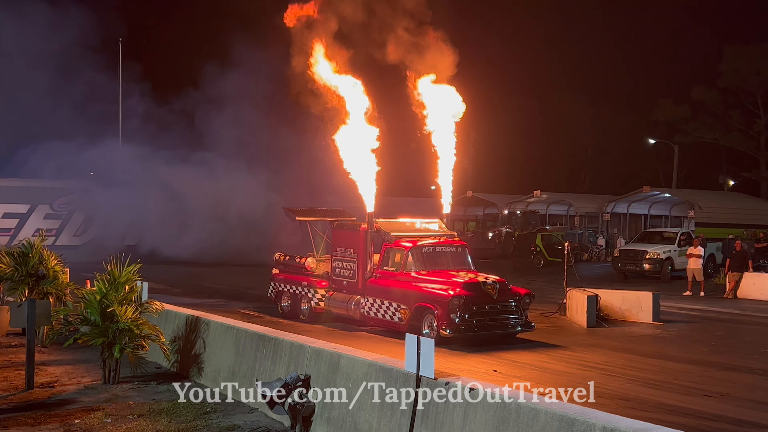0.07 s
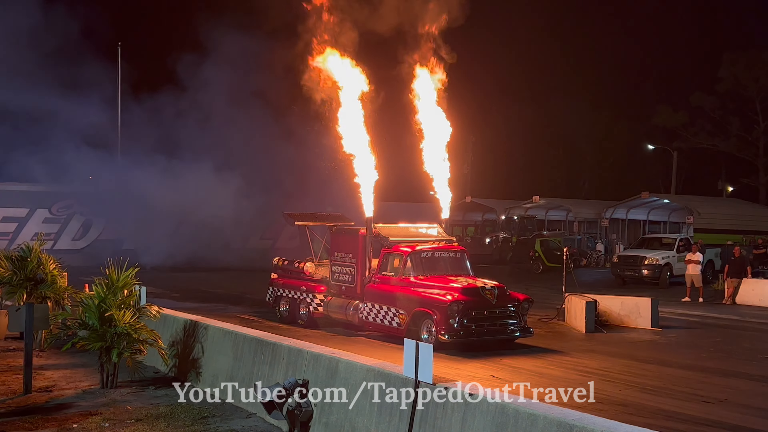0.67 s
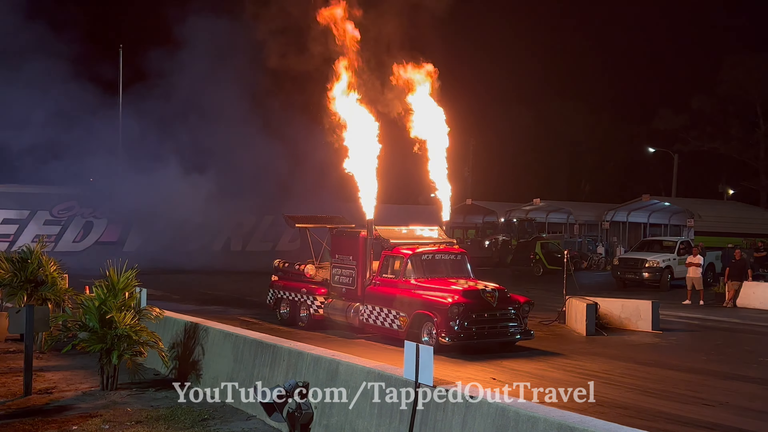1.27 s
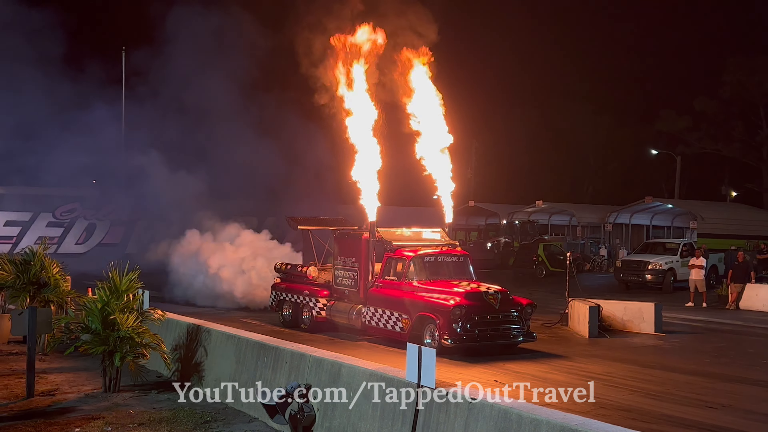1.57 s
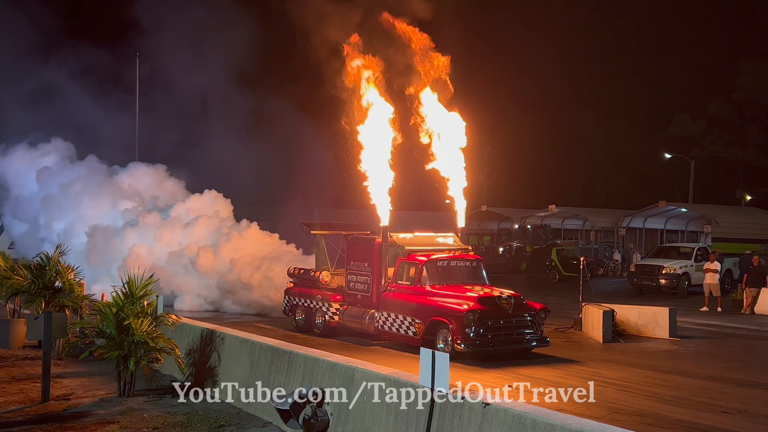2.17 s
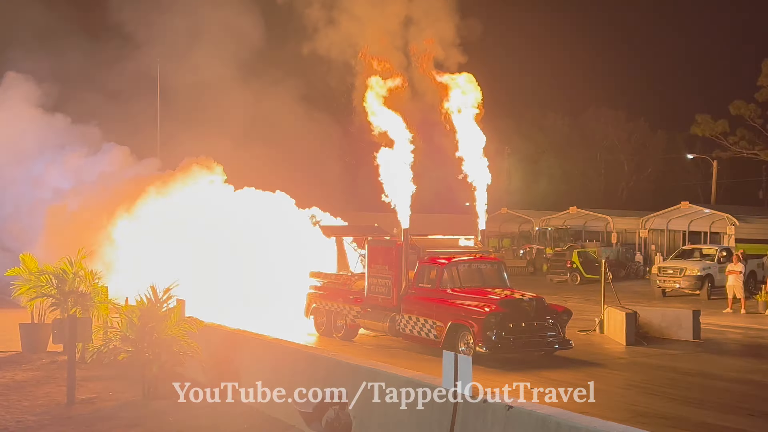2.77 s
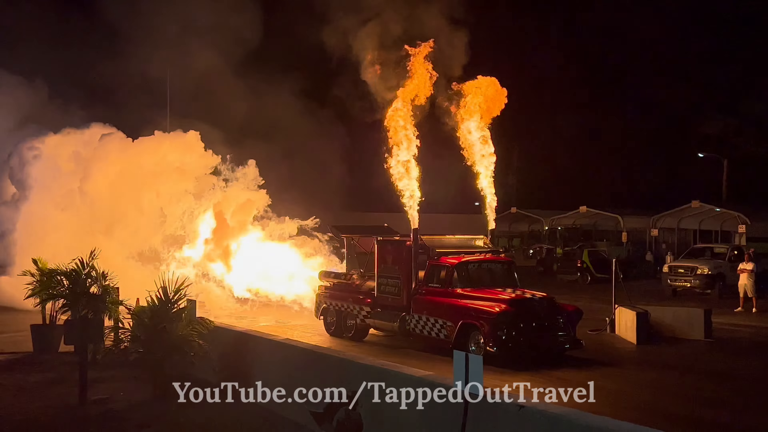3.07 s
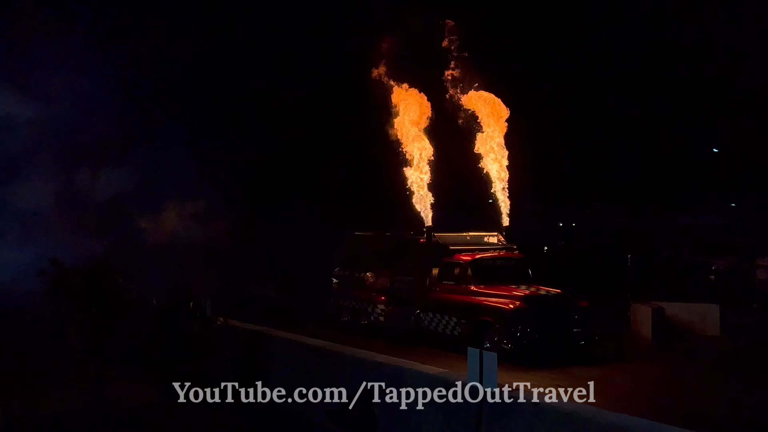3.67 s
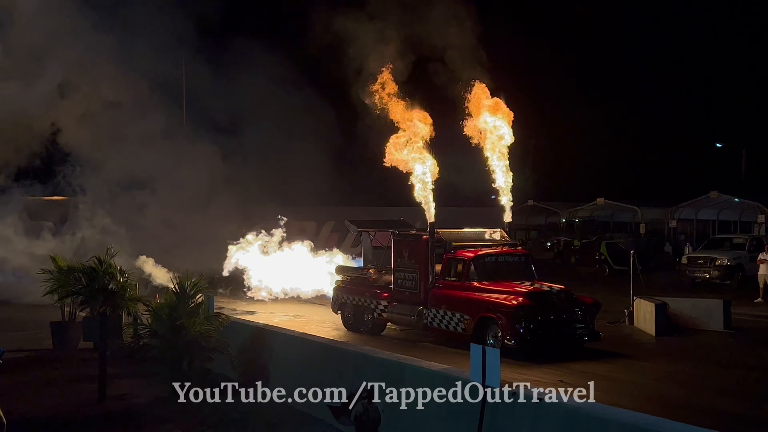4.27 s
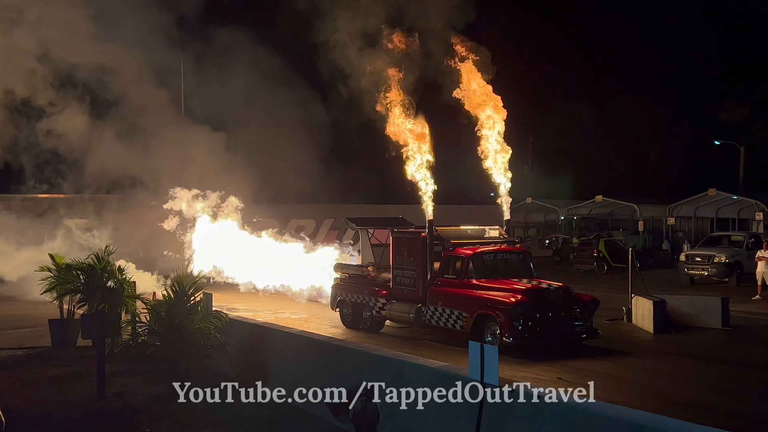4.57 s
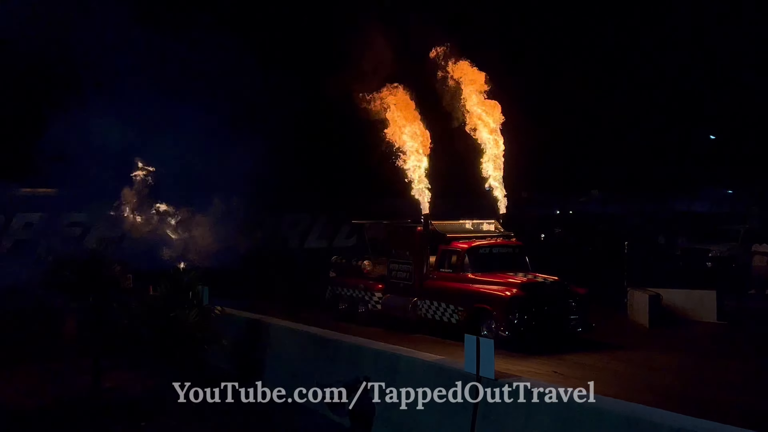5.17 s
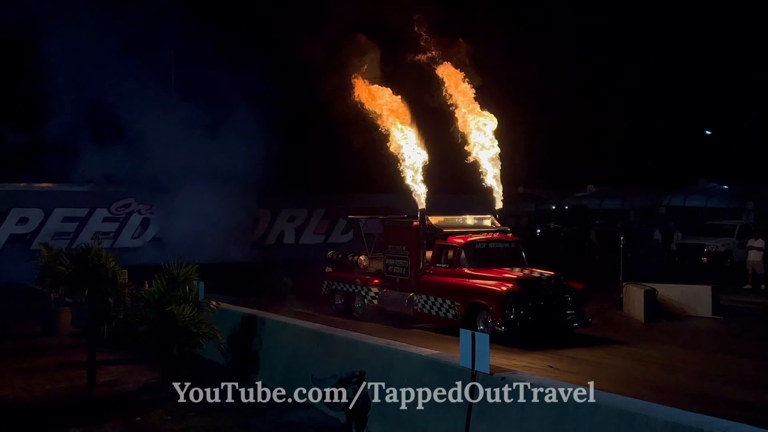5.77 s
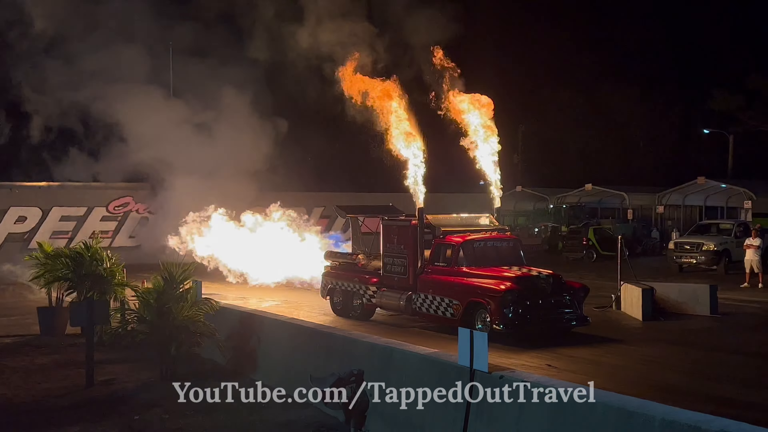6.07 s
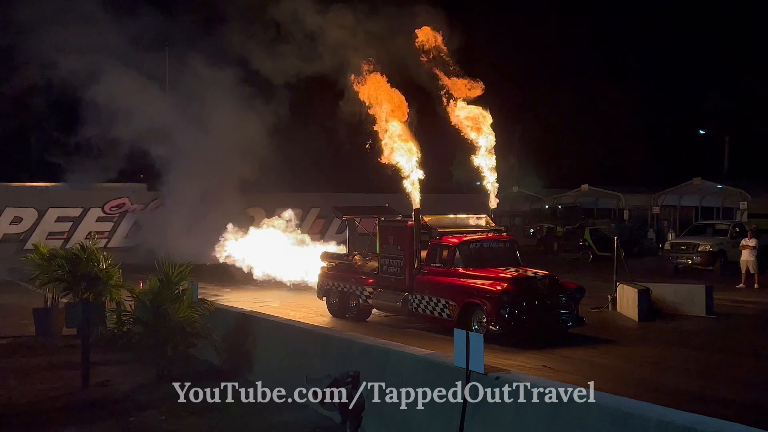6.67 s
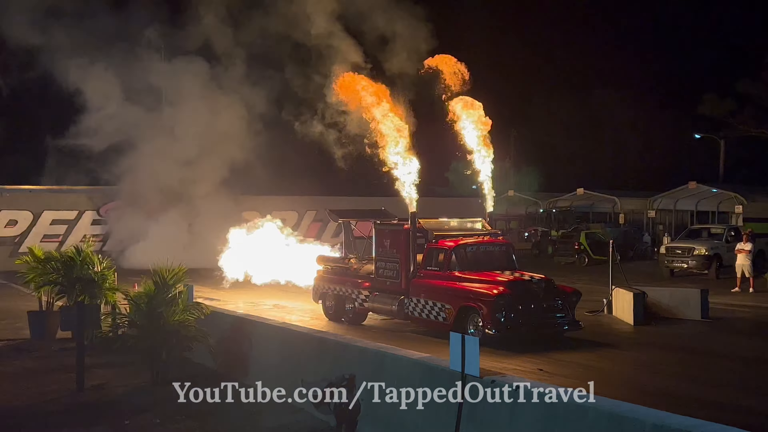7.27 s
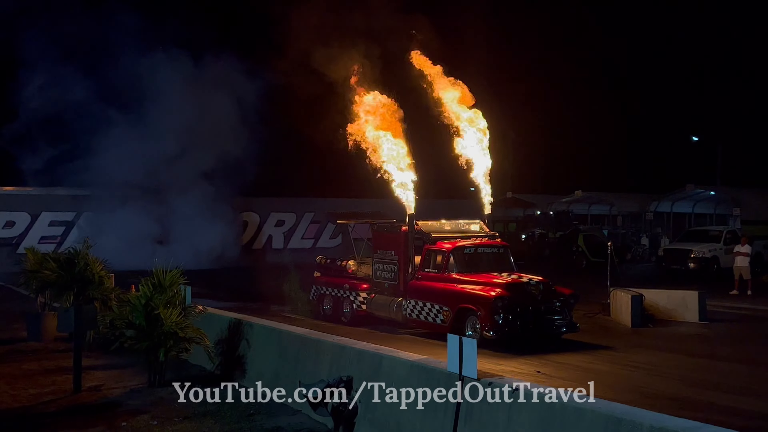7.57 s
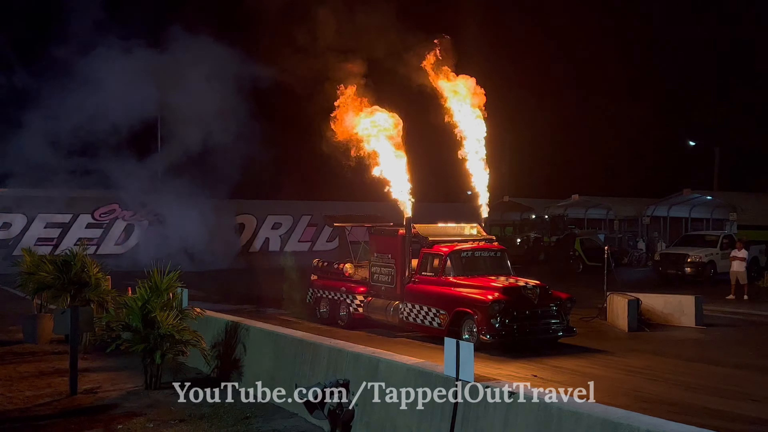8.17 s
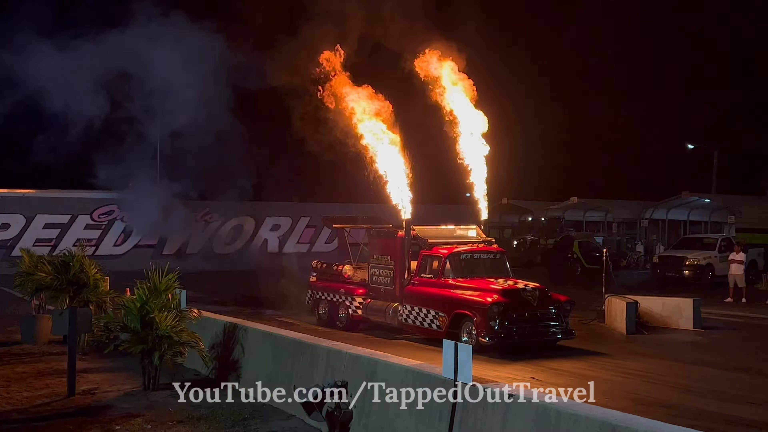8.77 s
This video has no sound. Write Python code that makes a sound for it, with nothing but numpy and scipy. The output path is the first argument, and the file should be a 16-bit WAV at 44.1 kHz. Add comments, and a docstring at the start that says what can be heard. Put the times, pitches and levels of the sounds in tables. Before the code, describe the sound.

From the start, a stationary jet truck's two turbines hold a high, shimmering whine at nearly the same pitch. Beneath it run a broad rush of air and the low flutter and hum of flame stacks. At about 2.7 seconds the afterburner lights with a loud, deep boom and roars until 3.7. Two quick blasts lead into another long burn from 4.2 to 5.2. Three short bursts follow, then a sustained roar from 5.9 to 6.6 and four rapid pulses ending near 7.4. Each begins with a tearing edge and swells into a sputtering fireball, with low thumps punching through and a brief outdoor echo. The whine continues throughout, sagging slightly and recovering. After a lull with just turbines, air and flames, three softer bursts come at about 8.3, 8.7 and 8.9 seconds. Everything sits nearly straight ahead.

```python
"""Two turbines whine at nearly the same pitch: a jet truck standing on a drag strip. Their blade
tones, each locked to its shaft, ride on a rush of air and the low flutter of two flame stacks.
Near 2.7 s the afterburner lights with a boom and is pulsed again and again. Each gush of fuel tears
at the jet and swells into a fireball. Low thumps punch through, and the shaft speeds sag and recover."""
import sys
import numpy as np
from scipy import signal
from scipy.fft import rfft, irfft, next_fast_len
from scipy.io import wavfile
from scipy.ndimage import uniform_filter1d

SR = 44100
rng = np.random.default_rng(int(sys.argv[2]) if len(sys.argv) > 2 else 0)


def int16_out(signal):
    """Quantize to a 16-bit WAV file."""
    q = np.round(np.clip(np.atleast_2d(signal).T, -1, 1) * 32767)
    wavfile.write(sys.argv[1], SR, q.astype(np.int16))


N = 393813
T = np.arange(N) / SR
HZ = np.fft.rfftfreq(next_fast_len(N, True), 1 / SR)
FFT_SIZE = 2 * len(HZ) - 2


def gain_of(db):
    """Decibels to amplitude."""
    return 10 ** (np.asarray(db) / 20)


def spectrum_curve(points):
    """A spectrum table on the frequency grid, joined on a log axis."""
    hz, value = np.transpose(points)
    return np.interp(np.log(HZ + 1), np.log(hz + 1), value)


def automation(rows):
    """Each column of a timed table as a curve with a value at every sample."""
    time_s, *columns = np.transpose(rows)
    return [np.interp(T, time_s, column) for column in columns]


def drift(rate_hz, count=2048):
    """A random wobble of rms one, moving at up to about the given rate."""
    hz = np.fft.rfftfreq(count, T[-1] / count)
    wobble = irfft(rfft(rng.standard_normal(count)) / (1 + (hz / rate_hz) ** 2))
    wobble /= np.sqrt(np.mean(wobble ** 2) + 1e-20)
    return np.interp(T, np.linspace(0, T[-1], count), wobble)


def blade_tone(turns, order, level_db, fade_db, scatter):
    """One multiple of the shaft speed; hot, moving air fades it and scatters its phase."""
    shimmer = 1 + scatter * (drift(rate_hz=17) + 1j * drift(rate_hz=17))
    level = np.sqrt(2) * gain_of(level_db + fade_db * drift(rate_hz=4.4))
    phase = 2 * np.pi * (order * turns + rng.random())
    return level * (shimmer * np.exp(1j * phase)).real


def uneven_blades(turns, over_rush_db, count=130, size=8192):
    """No two blades are alike: a ragged pattern repeats each turn as a faint buzz of shaft orders."""
    order = np.arange(count)
    mean_shaft_hz = turns[-1] / T[-1]
    rush_db = np.interp(order * mean_shaft_hz, *np.transpose(AIR_BODY + AIR_HISS))
    partials = rng.standard_normal(count) + 1j * rng.standard_normal(count)
    partials *= gain_of(rush_db + over_rush_db)
    has_own_voice = np.isin(order, [k for k, _ in LEAD_TONES])
    partials[(order < 3) | has_own_voice] = 0
    one_turn = irfft(partials, size) * size / 2
    return np.interp(turns % 1, np.arange(size) / size, one_turn)


# First blade row, second blade row, octave of the first: shaft_multiple, scatter_ratio
LEAD_TONES = [(17, .2), (20, .2), (34, .33)]
def turbine(shaft_hz, whine_db, octave_db, faint_tones, first_row_db, first_row_dip_db):
    """Blade rows, overtones and gears, all locked to one shaft; their balance shifts as it sags."""
    turns = np.cumsum(shaft_hz * (1 + .00015 * drift(rate_hz=6))) / SR
    sag = np.clip((shaft_hz.max() - shaft_hz - .06) / .65, 0, 1)  # 0 at top speed, 1 at full sag
    lead_levels_db = first_row_db - first_row_dip_db * sag, whine_db, octave_db
    lead = sum(blade_tone(turns, order, db, fade_db=1.53, scatter=scatter)
               for (order, scatter), db in zip(LEAD_TONES, lead_levels_db))
    faint = sum(blade_tone(turns, order, db - dip_db * sag, fade_db=1.1, scatter=.22)
                for order, db, dip_db in faint_tones)
    return lead + faint + uneven_blades(turns, over_rush_db=7)


# Shaft speeds, sagging and recovering: time_s, slow_turbine_hz, fast_turbine_hz
SHAFT_SPEEDS = [(0, 109.58, 113.72), (2.72, 109.5, 113.63), (3.05, 109.47, 113.08), (3.72, 109.44, 112.64),
                (4.05, 108.74, 112.42), (4.3, 108.82, 112.43), (4.7, 109.33, 112.82), (5.2, 109.57, 113.04),
                (5.6, 108.97, 112.7), (5.9, 108.7, 112.6), (6.25, 109.38, 112.93), (6.6, 109.54, 113.03),
                (7, 108.95, 112.68), (7.35, 108.76, 112.57), (7.75, 109.16, 113.35), (8.22, 109.42, 113.88),
                (8.5, 109.17, 113.46), (8.93, 109, 113.14)]
# Fader for the main whine, from the second blade row: time_s, slow_turbine_db, fast_turbine_db
WHINE_FADER = [(0, -36.5, -44), (1.7, -35, -40), (2.6, -38.5, -38), (2.9, -42, -30), (3.3, -34.5, -33),
               (5.1, -38.5, -34), (5.6, -36, -34.5), (6.1, -40, -34), (7.4, -38.5, -35), (7.85, -41, -30),
               (8.22, -47, -41), (8.5, -39, -31.5), (8.93, -41, -36.5)]
# Fader for the whistle an octave above the first row: time_s, slow_turbine_db, fast_turbine_db
OCTAVE_FADER = [(0, -55, -47), (.3, -49, -38), (1.05, -40, -37.5), (1.6, -45, -44), (2.8, -41, -47),
                (3.3, -42.5, -37), (4.3, -45, -42.5), (5.4, -47, -39), (6.3, -41, -37.5),
                (7.8, -41.5, -42.5), (8.2, -45, -38), (8.6, -45, -48), (8.93, -50, -39)]
# Faint blade and gear tones of each turbine: shaft_multiple, level_db, dip_at_full_sag_db
SLOW_FAINT_TONES = [(5.41, -47, 0), (23.1, -45.5, 1), (23.8, -47, 2), (24.52, -50, 5), (25, -52, -5),
                    (25.41, -49, 5), (27, -55, 0), (34.9, -59, 0), (37, -51, 4), (40, -47.5, -2),
                    (46, -59, 1), (51, -54, -2), (56, -58, 5), (68, -53, 5), (71, -59, 2), (74, -57, 5),
                    (80, -60, 6), (102, -54, 7)]
FAST_FAINT_TONES = [(25, -54, 0), (26, -54, 0), (28, -56, 3), (37, -48.5, 0), (40, -42.5, 10.5),
                    (49, -59, 1), (51, -40.5, 12), (54, -57, 2), (57, -56, 4), (60, -59, 0), (68, -55, -1),
                    (71, -61, 1), (77, -60, 5), (102, -62, 2)]
def twin_whine():
    """Two turbines, their shafts about 4 Hz apart, sing as a detuned pair."""
    slow_hz, fast_hz = automation(SHAFT_SPEEDS)
    slow_db, fast_db = automation(WHINE_FADER)
    slow_octave_db, fast_octave_db = automation(OCTAVE_FADER)
    slow = turbine(slow_hz, slow_db, slow_octave_db, SLOW_FAINT_TONES,
                   first_row_db=-37, first_row_dip_db=3)
    fast = turbine(fast_hz, fast_db, fast_octave_db, FAST_FAINT_TONES,
                   first_row_db=-44.5, first_row_dip_db=-2.5)  # this row gets louder in a sag
    return slow + fast


# How alike the noise is at the two microphone ports, 1 being mono: freq_hz, correlation
STEREO_LIKENESS = [(60, 1), (140, .995), (300, .965), (500, .93), (800, .89), (1600, .88), (2100, .99),
                   (2400, .99), (2700, .93), (3200, .9), (3700, .94), (4400, 1)]
def turbulence(gain, left_db=0):
    """Churning air: noise of a given amplitude per root Hz, partly shared by left and right."""
    shared, apart = rfft(rng.standard_normal((2, FFT_SIZE)))
    likeness = np.clip(spectrum_curve(STEREO_LIKENESS), 0, 1)
    mid = shared * np.sqrt((1 + likeness) / 2)
    side = apart * np.sqrt((1 - likeness) / 2)
    pan = gain_of(left_db / 2 * HZ ** 2 / (HZ ** 2 + 70 ** 2))  # the longest waves reach both alike
    stereo = np.array([(mid + side) * pan, (mid - side) / pan])
    return irfft(stereo * gain * np.sqrt(SR / 2))[:, :N]


# Body and top-end hiss of the air through the engines: freq_hz, density_db (per Hz)
AIR_BODY = [(120, -75), (290, -69), (400, -62), (800, -62.5), (1200, -63), (1600, -66), (2100, -64),
            (2550, -62.5), (3300, -67.5), (4200, -68.5), (5100, -71), (7200, -71.5)]
AIR_HISS = [(8500, -75), (10000, -80), (11800, -75.5), (13500, -81.5), (15700, -85)]
# Fader for the rush: time_s, gain_db
AIR_FADER = [(0, 0), (1, 0.5), (2.7, 1), (3.2, 1.5), (4, 0.4), (5.3, 0), (6.5, -.5), (7.5, -1.3),
             (8.93, -1)]
def air_rush():
    """A broad bed of intake and exhaust noise, wavering a little in the heat."""
    fader_db, = automation(AIR_FADER)
    air = turbulence(gain_of(spectrum_curve(AIR_BODY + AIR_HISS)))
    return air * gain_of(fader_db + .2 * drift(rate_hz=6))


# Low flutter of the flames: freq_hz, density_db (per Hz)
FLUTTER_SPECTRUM = [(20, -100), (40, -65), (58, -57.5), (110, -60), (190, -65), (290, -73.5), (600, -101)]
# Hum of the exhaust pipes: pitch_hz, width_hz, density_db (per Hz)
PIPE_RESONANCE = [(137.2, 19.6, -48)]
# Fader for flutter and hum together: time_s, gain_db
FLAME_FADER = [(0, 0.5), (1.2, 1.5), (2.6, -1), (7.5, 0.5), (8.1, 1.5), (8.93, -4)]
def flame_stacks():
    """The stack flames flutter and set the exhaust pipes humming."""
    flutter_power = gain_of(spectrum_curve(FLUTTER_SPECTRUM)) ** 2
    pipe_power = sum(gain_of(db) ** 2 / (1 + (2 * (HZ - hz) / width_hz) ** 2) ** 2
                     for hz, width_hz, db in PIPE_RESONANCE)
    fader_db, = automation(FLAME_FADER)
    return turbulence(np.sqrt(flutter_power + pipe_power)) * gain_of(fader_db)


def burn(start_s, length_s, attack_s, release_s):
    """Envelope of one burst: it rises, holds while the fuel flows, and dies once it is cut."""
    attack = np.clip((T - start_s) / attack_s, 0, 1)
    return attack * np.exp(-np.maximum(T - start_s - length_s, 0) / release_s)


def with_tail(power, tail_db, tail_s):
    """Amplitude envelope of a roar together with its dying echo from the walls and stands."""
    feedback = np.exp(-1 / (tail_s * SR))
    tail = signal.lfilter([1 - feedback], [1, -feedback], power)
    return np.sqrt(power + gain_of(tail_db) ** 2 * tail)


def fire_noise(colour, left_db, span_s):
    """Turbulence levelled to an rms near one: the slow swells go, the fast churning stays."""
    noise = turbulence(gain_of(spectrum_curve(colour)), left_db)
    power = uniform_filter1d((noise ** 2).mean(0), int(span_s * SR))
    power = uniform_filter1d(power, int(span_s * SR / 2))
    return noise / np.sqrt(np.abs(power) + 1e-12)


# Tone colour of the afterburner's deep boom and tearing roar: freq_hz, relative_db
BOOM_COLOUR = [(20, -46), (33, -13), (48, -5), (60, 3), (85, -4), (115, -1.5), (145, -2.5), (190, -6.5),
               (250, -13), (400, -25.5), (900, -65)]
ROAR_COLOUR = [(60, 2), (160, -4), (260, -2.5), (400, 2), (550, -4), (800, -6.5), (1100, -13.5),
               (1600, -18.5), (3000, -31), (8000, -62), (15000, -70)]
# Cues for the gushes of fuel: start_s, length_s, swell_s, fireball_db, tearing_db
FUEL_BURSTS = [(2.733, 0.17, .025, -11.5, -22.5), (2.96, 0.7, .025, -12, -26.5),
               (3.789, .1, .05, -15.5, -21.5), (3.994, .1, .025, -12.5, -25),
               (4.186, .99, 0.085, -13.5, -25), (5.28, 0.11, 0.11, -12.5, -24.5),
               (5.49, .12, .03, -15.5, -26), (5.692, 0.094, .07, -14, -24.5),
               (5.899, 0.67, 0.055, -14.5, -26.5), (6.662, .12, .1, -14, -24.5),
               (6.866, 0.1, 0.047, -13.5, -23.5), (7.058, 0.09, .04, -14.5, -23),
               (7.243, 0.12, 0.06, -18, -25.5), (8.27, .14, .13, -17, -26), (8.659, .13, 0.054, -15, -27),
               (8.865, .1, .04, -17.5, -26)]
def afterburner(boom_db, roar_db, sputter_db, billow_db, left_db):
    """Each gush of fuel tears at the jet and then swells into a booming fireball."""
    boom_power, roar_power = np.zeros((2, N))
    for start_s, length_s, swell_s, fireball_db, tearing_db in FUEL_BURSTS:
        fireball = burn(start_s, length_s, attack_s=swell_s, release_s=.028)
        tearing = burn(start_s, length_s, attack_s=.4 * swell_s, release_s=.054)
        flare_db = 4 * np.exp(-np.maximum(T - start_s, 0) / .19)  # the roar flares, then settles
        boom_power += (gain_of(fireball_db) * fireball) ** 2
        roar_power += (gain_of(tearing_db + flare_db) * tearing) ** 2
    boom_level = with_tail(boom_power, tail_db=-8.5, tail_s=.16)
    roar_level = with_tail(roar_power, tail_db=-7, tail_s=.13) * gain_of(roar_db)
    # The boom noise dips around each low thump and around the ignition.
    for centre_s, _, pitch_hz in LOW_THUMPS:
        boom_level *= 1 - .46 * np.exp(-((T - centre_s) * pitch_hz) ** 2)
    ignition_s, _, ignition_hz, _ = FIRST_FIREBALL
    boom_level *= 1 - .28 * np.exp(-((T - ignition_s) * ignition_hz / 2) ** 2)
    boom_level *= gain_of(boom_db + billow_db * drift(rate_hz=16))
    boom = boom_level * fire_noise(BOOM_COLOUR, left_db, span_s=.073)
    roar = roar_level * fire_noise(ROAR_COLOUR, left_db, span_s=.077)
    sputter = gain_of(sputter_db * drift(rate_hz=35))  # uneven fuel shakes the whole flame
    return (boom + roar) * sputter


# Sub hit as the first cloud of fuel catches fire: start_s, level_db, pitch_hz, t60_s
FIRST_FIREBALL = (2.751, -4.5, 55, .2)
def ignition():
    """The big fireball swells, overshoots and rebounds a few times."""
    start_s, level_db, pitch_hz, t60_s = FIRST_FIREBALL
    age_s = np.maximum(T - start_s, 0)
    return gain_of(level_db - 60 * age_s / t60_s) * np.sin(2 * np.pi * pitch_hz * age_s)


# The strongest single low pulses in the afterburner's boom: centre_s, level_db, pitch_hz
LOW_THUMPS = [(2.759, -1, 81), (2.828, -0.5, 115), (3.22, 1.5, 131), (3.529, -2, 101), (3.639, -4, 106),
              (4.032, 0, 113), (4.508, -1, 128), (5.131, -3.5, 102), (5.401, -3, 114), (5.771, -7, 137),
              (6.175, -1, 126), (6.293, -2.5, 123), (6.551, -6, 125), (6.769, -2, 105), (7.348, -4.5, 84),
              (8.387, -4, 131), (8.783, -3.5, 84)]
def low_thumps(trim_db, steepness, echo_s, echo_db):
    """Each thump is a push of air that drops steeply into suction; the track wall returns it."""
    direct = np.zeros(N)
    for centre_s, level_db, pitch_hz in LOW_THUMPS:
        near = np.abs(T - centre_s) < 2 / pitch_hz
        phase = 2 * np.pi * pitch_hz * (T[near] - centre_s)
        push_pull = -np.tanh(steepness * np.sin(phase))
        direct[near] += gain_of(level_db + trim_db) * push_pull * np.exp(-(phase / 3.83) ** 2)
    return direct + gain_of(echo_db) * np.interp(T - echo_s, T, direct)


def scene():
    """The mix: turbines dead ahead, afterburner and thumps a touch to the left."""
    whine = twin_whine()
    fire = afterburner(boom_db=-.5, roar_db=-.7, sputter_db=1.0, billow_db=1.5, left_db=.5)
    thumps = low_thumps(trim_db=-.5, steepness=1.05, echo_s=.0175, echo_db=-18.5)
    pan_left = gain_of([[.2], [-.2]])
    return whine + air_rush() + flame_stacks() + fire + ignition() + thumps * pan_left


# Phase offset between the two microphone ports: freq_hz, left_lead_rad
STEREO_PHASE = [(0, 0), (800, -.05), (1600, -.3), (1870, -.33), (2200, -.08), (2500, .03), (3200, .55),
                (3700, .52), (4000, 0), (8600, 0), (9100, -1.4), (10150, -3.14), (12000, -6.28),
                (13900, -9.42), (15400, -12.57)]
def record(dry, low_cut_hz=41, high_cut_hz=15800):
    """Master chain: low cut, left and right out of step in the treble, soft clip, high cut."""
    spectrum = rfft(dry, FFT_SIZE) * HZ ** 4 / np.sqrt(HZ ** 8 + low_cut_hz ** 8)
    spectrum[1] *= np.exp(-1j * np.interp(HZ, *np.transpose(STEREO_PHASE)))
    mix = irfft(spectrum)[:, :N]
    rounded = mix / (1 + mix ** 6) ** (1 / 6)
    high_cut = signal.firwin(511, high_cut_hz, window=("kaiser", 9), fs=SR)
    return signal.oaconvolve(rounded, high_cut[None], "same")


dry = scene()
out = record(dry)
int16_out(out)
```